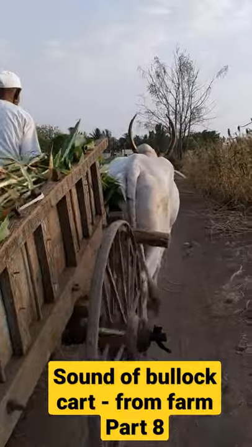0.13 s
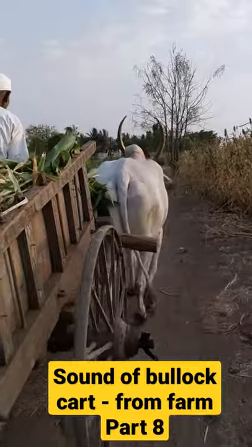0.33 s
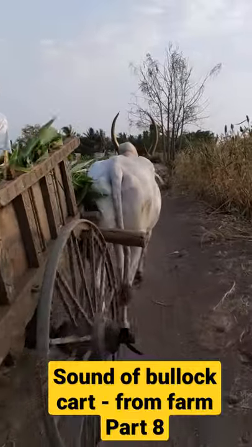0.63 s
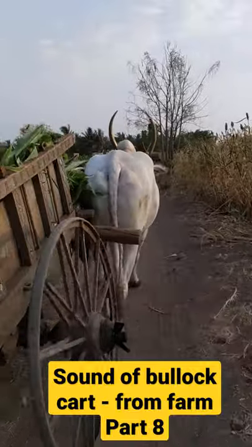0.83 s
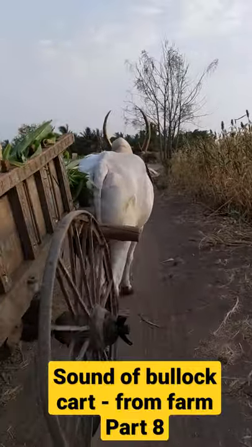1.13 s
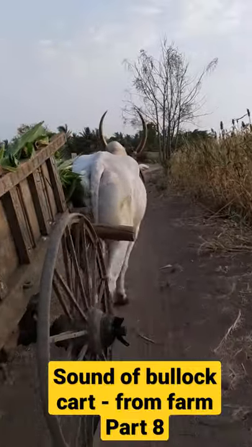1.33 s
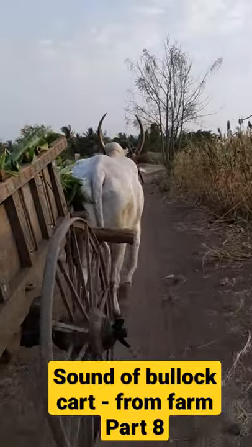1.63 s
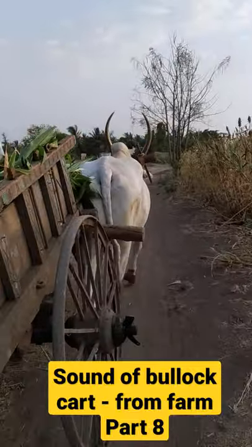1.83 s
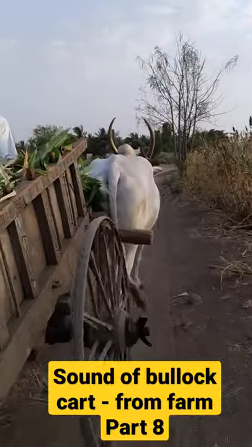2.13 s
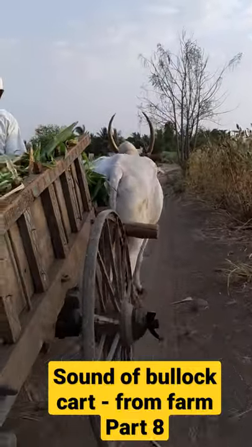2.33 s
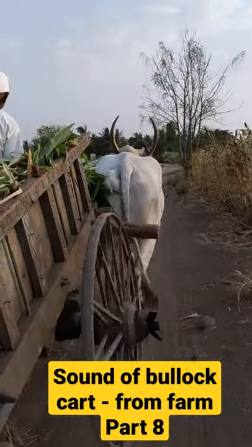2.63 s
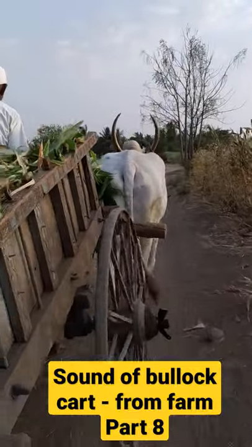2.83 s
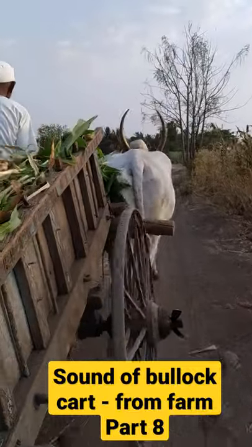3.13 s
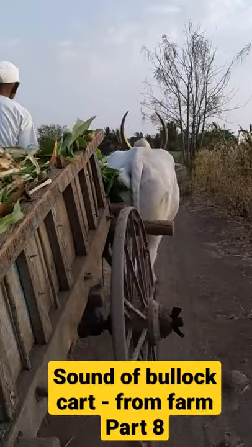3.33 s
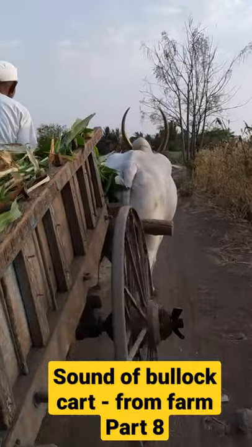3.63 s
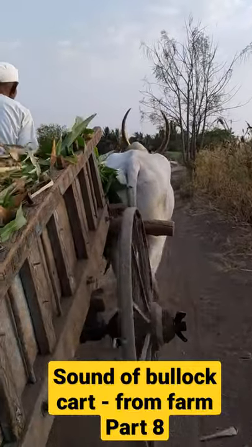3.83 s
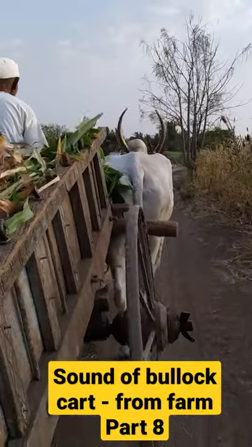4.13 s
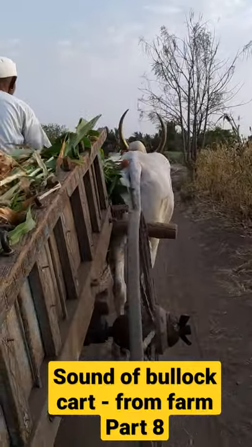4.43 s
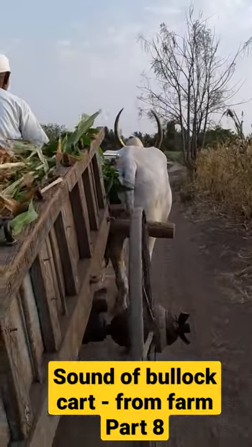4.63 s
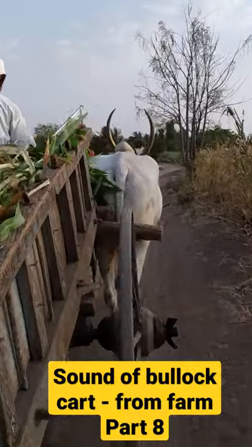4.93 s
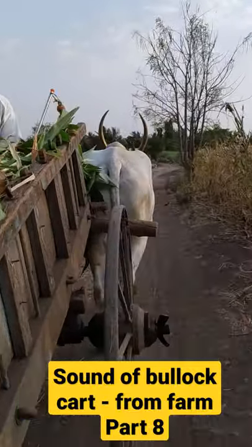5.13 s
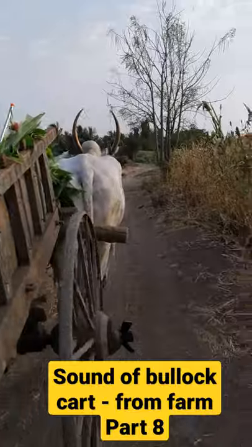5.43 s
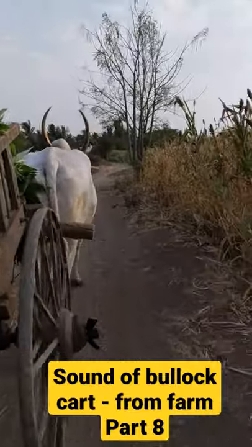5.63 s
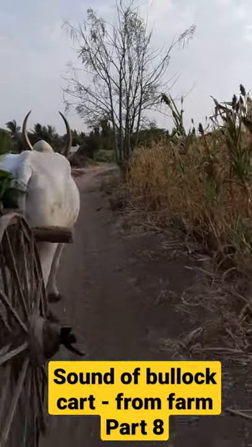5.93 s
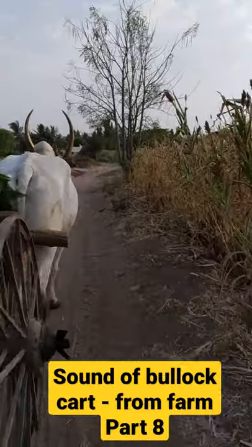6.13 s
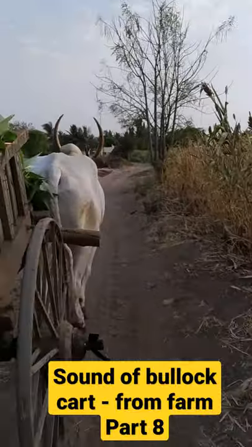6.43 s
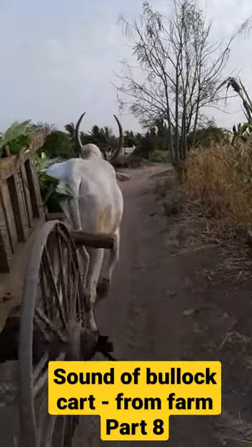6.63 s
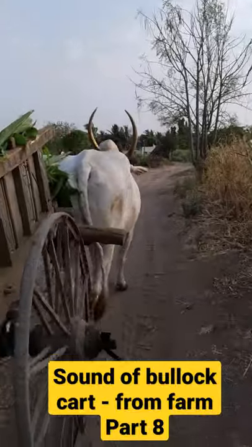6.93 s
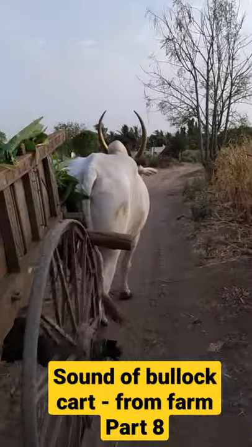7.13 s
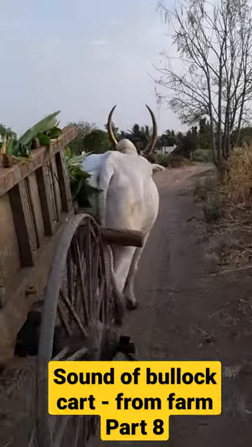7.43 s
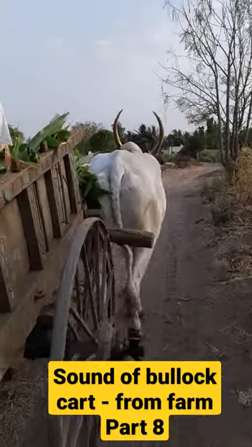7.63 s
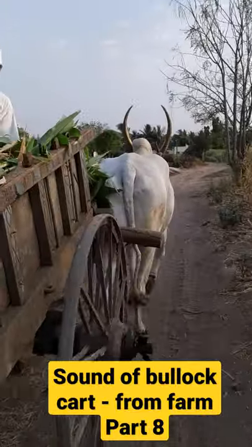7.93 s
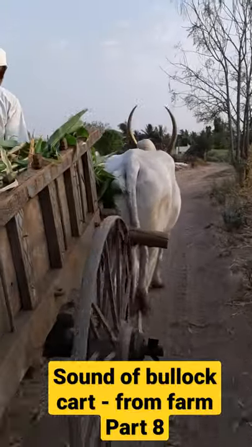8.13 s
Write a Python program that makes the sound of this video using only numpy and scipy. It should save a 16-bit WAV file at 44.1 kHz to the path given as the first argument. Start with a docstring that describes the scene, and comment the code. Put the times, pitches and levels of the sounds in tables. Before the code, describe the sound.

Irregular bright metal clanks and dry wooden knocks from a slow bullock cart, with low frame rumble, gritty rolling and light wind buffeting.

```python
"""Ox cart on a dirt track

Loose iron at the axle clanks when a wheel jolts, and the iron tyre rings on: contact bursts excite decaying modes.
The wooden frame knocks by the same principle and rumbles under a ceaseless shower of small contacts.
Dry grit hisses under the rims as shaped grain noise; wind buffets two microphones as partly shared low noise.
"""
import sys
import numpy as np
from scipy import signal
from scipy.fft import rfft, irfft, next_fast_len
from scipy.io import wavfile
from scipy.ndimage import uniform_filter1d

SR = 44100
rng = np.random.default_rng(int(sys.argv[2]) if len(sys.argv) > 2 else 0)


def waveform_to_disk(signal):
    """Save audio, clipped to [-1, 1], as 16-bit WAV at the path in sys.argv[1]."""
    frames = np.transpose(np.atleast_2d(signal))
    scaled = np.clip(frames, -1, 1) * 32767
    samples = np.round(scaled).astype(np.int16)
    wavfile.write(sys.argv[1], SR, samples)


N = 365588

# iron clanks, levels ahead of the gain of the iron: start_s, level_db, ring under 3.6 kHz and at 3.6-6 kHz
# relative to the treble (low_db, mid_db), leading rings low_hz, mid_hz, treble_hz, rattle_s
CLANKS = [(0.1039, -14, -10.5, -12, 2630, 5300, 7050, 0.012),
          (0.145, -33, -22, -23, 2550, 4640, 7600, 0.065),
          (0.2915, -28.5, -15.5, -12.5, 3400, 3960, 6800, 0.0042),
          (0.398, -31.5, -17, -12, 2080, 4500, 6550, 0.017),
          (0.4262, -17, -16, -9, 2780, 4300, 6500, 0.012),
          (0.4476, -20.5, -1.5, -8, 1930, 4440, 8300, 0.0093),
          (0.5292, -26.5, -9, -5, 2060, 3800, 8340, 0.04), (0.6, -30, -29, -28, 3510, 5460, 8560, 0.045),
          (0.72, -35, 8, -23, 2170, 4400, 7900, 0.022), (0.7386, -27.5, -15, -7, 2550, 4390, 7800, 0.017),
          (0.7524, -14.5, -19.5, -17, 3060, 5020, 9770, 0.0053),
          (0.7728, -14, -19, -22, 2490, 4430, 7730, 0.013), (0.794, -33, -6, 4, 2510, 4450, 7560, 0.022),
          (0.862, -21.5, -10, -17, 2240, 4820, 10030, 0.0039),
          (1.5658, -35, -6, -13.5, 3020, 3800, 9040, 0.016),
          (1.8567, -36.5, 3.5, -9, 2400, 3800, 7250, 0.014),
          (2.5207, -20, -6.5, -14, 2480, 4540, 6760, 0.012),
          (2.5466, -8, -14.5, -23, 2490, 4320, 6500, 0.0088),
          (2.5577, -11.5, -11, -17, 2600, 5020, 9930, 0.0043),
          (2.5743, -27.5, -10, -11, 2670, 5080, 6700, 0.013),
          (2.606, -32.5, -27, -25, 2200, 4380, 9800, 0.01),
          (2.6304, -33.5, -29, -30, 2240, 3860, 7300, 0.0032),
          (2.738, -45, -11, 4, 2290, 5500, 7600, 0.0071), (2.767, -40, -19, -15, 2100, 4690, 8920, 0.0099),
          (2.852, -37, 1, -2, 2270, 4410, 6760, 0.01), (3.164, -24, -17, -10, 2420, 4540, 6980, 0.026),
          (3.1873, -25, 7, 1, 2530, 4380, 5830, 0.0084),
          (3.1961, -9.5, -12.5, -14, 2430, 4440, 9560, 0.0072),
          (3.206, -17, -10, -2, 2660, 4600, 8300, 0.0063), (3.249, -35, 17, -5, 2240, 3750, 9700, 0.0091),
          (3.3406, -28.5, -8.5, -20, 2270, 4850, 6250, 0.0014),
          (3.409, -35, -2, -8, 2140, 4820, 8660, 0.018), (3.431, -36, -11, -34, 3260, 5350, 9800, 0.0029),
          (4.045, -45, 4, -18, 2510, 4410, 6720, 0.013), (4.3695, -34, -5, -13, 2540, 4710, 10000, 0.02),
          (4.493, -38.5, -0.5, -20, 2450, 5190, 9600, 0.02),
          (5.1016, -33, -11.5, -8, 3380, 3860, 7260, 0.019),
          (5.1676, -34.5, -16, -15, 2540, 4730, 7700, 0.014),
          (5.8087, -41.5, 8, -16, 2550, 4000, 8700, 0.011), (5.8396, -33, -12, -20, 2130, 5000, 8870, 0.01),
          (6.0586, -17.5, -15, -17.5, 2700, 4640, 6770, 0.0086),
          (6.099, -8.5, -22, -22, 2500, 4610, 6760, 0.0051),
          (6.1107, -14, -9, -7.5, 2446, 4260, 8000, 0.0079),
          (6.1759, -29.5, 2, -18, 2220, 4400, 6750, 0.018),
          (6.276, -32.5, -12, -10, 2090, 4400, 6800, 0.022),
          (6.3736, -28, -16.5, -14, 2830, 4500, 6760, 0.011),
          (6.3914, -45, -21, -20, 3340, 4800, 6780, 0.034),
          (6.427, -34.5, -9, -16.5, 2560, 4660, 7450, 0.026), (6.553, -33, 4, -16, 2170, 5070, 6750, 0.013),
          (7.3443, -32, -14, -27, 2260, 4360, 8040, 0.0061),
          (8.069, -38.5, -10, 2, 3200, 3800, 6840, 0.012),
          (8.1373, -32.5, -30, -5, 1950, 4430, 8060, 0.022),
          (8.196, -36, -22, -13, 2350, 5070, 6810, 0.013)]
# frame knocks, levels ahead of the gain of the frame: start_s, level_db, ring above 750 Hz relative to
# the middle (high_db), leading rings under and above 750 Hz (low_hz, high_hz), shudder_s
KNOCKS = [(0.102, -17.5, 10, 442, 1755, 0.011), (0.12, -19, -3.5, 527, 1090, 0.019),
          (0.293, -32, 2, 604, 1020, 0.011), (0.403, -40, -15, 600, 870, 0.026),
          (0.424, -20.5, 12, 654, 910, 0.027), (0.535, -21.5, 1, 566, 1010, 0.026),
          (0.702, -30.5, 9, 610, 960, 0.0084), (0.727, -27, 19, 560, 1080, 0.014),
          (0.779, -20, 19, 432, 1170, 0.018), (0.807, -28, -11, 560, 1100, 0.012),
          (0.845, -26, 4.5, 537, 1150, 0.02), (0.883, -15.5, 30, 500, 1600, 0.0041),
          (0.897, -31, 12, 500, 1090, 0.0043), (0.916, -36, 15, 510, 1300, 0.0075),
          (0.934, -33, 21, 596, 1590, 0.02), (0.982, -32.5, 3, 627, 1300, 0.015),
          (1.003, -34.5, -8, 624, 830, 0.0098), (1.124, -38, 12, 644, 1160, 0.0087),
          (1.25, -47.5, 6, 640, 1520, 0.028), (1.511, -35, -1, 626, 780, 0.0055),
          (1.558, -39.5, 11, 640, 840, 0.093), (1.771, -39.5, 3, 646, 1580, 0.014),
          (1.988, -31.5, 0, 573, 1040, 0.026), (2.08, -42, 8, 610, 780, 0.024),
          (2.101, -32, 3, 590, 805, 0.022), (2.119, -36, 0, 450, 910, 0.0069),
          (2.154, -32, -7, 555, 770, 0.0079), (2.332, -35, -8, 490, 930, 0.037),
          (2.393, -35, 5, 503, 800, 0.018), (2.499, -37, 3, 650, 940, 0.0071),
          (2.516, -24.5, 3, 447, 890, 0.06), (2.546, -21, 11, 437, 870, 0.028),
          (2.693, -30.5, 4, 624, 880, 0.006), (2.775, -41, 1, 585, 1050, 0.026),
          (2.989, -38, 6, 643, 940, 0.035), (3.009, -34, 8, 510, 750, 0.051),
          (3.06, -37.5, -7, 620, 780, 0.024), (3.166, -30, -5, 446, 960, 0.0095),
          (3.207, -28.5, -11, 616, 1340, 0.012), (3.342, -33.5, -1.5, 552, 875, 0.016),
          (3.432, -34.5, -1, 493, 1520, 0.017), (3.761, -40.5, 3, 586, 1010, 0.0059),
          (3.855, -46, -8, 640, 1300, 0.014), (3.88, -37, -4, 605, 1200, 0.02),
          (3.938, -37.5, -5, 660, 1080, 0.062), (3.983, -31.5, 0, 610, 910, 0.011),
          (4.15, -44.5, -15, 530, 1580, 0.1), (4.255, -37.5, -0.5, 583, 920, 0.015),
          (4.344, -40.5, 0, 626, 940, 0.05), (4.368, -37, -2, 530, 860, 0.013),
          (4.501, -40.5, -4, 526, 940, 0.023), (4.539, -40, 9, 580, 1060, 0.019),
          (4.586, -41.5, -6, 605, 970, 0.014), (4.626, -39, -13, 627, 1020, 0.0045),
          (4.833, -38.5, -5, 606, 1000, 0.014), (5.109, -40, 7, 684, 750, 0.054),
          (5.084, -41, 3, 560, 900, 0.0054), (5.79, -36.5, 0, 554, 970, 0.013),
          (5.81, -32.5, 1.5, 644, 1300, 0.1), (5.947, -34.5, 7, 650, 1020, 0.016),
          (5.975, -32, 0, 580, 1310, 0.01), (6.034, -30.5, 2, 615, 905, 0.016),
          (6.055, -23.5, 8, 616, 910, 0.044), (6.108, -31.5, -15, 530, 1010, 0.046),
          (6.1975, -14.5, 15, 653, 980, 0.0022), (6.205, -24, 8, 640, 855, 0.0086),
          (6.266, -29.5, 3, 447, 810, 0.036), (6.366, -26.5, 3.5, 690, 930, 0.034),
          (6.557, -29, 5, 674, 900, 0.035), (6.649, -34.5, 10, 484, 1140, 0.013),
          (6.744, -42, -2, 595, 780, 0.012), (6.807, -41, -8, 585, 980, 0.0026),
          (7.118, -39.5, -4.5, 670, 1760, 0.021), (7.344, -24, 12.5, 450, 885, 0.018),
          (7.404, -31.5, 6, 647, 860, 0.067), (7.44, -39, -15, 704, 810, 0.037),
          (7.5, -38, -3.5, 492, 1500, 0.12), (7.588, -40, -3, 560, 1140, 0.0088),
          (7.659, -37.5, -13, 500, 1340, 0.0062), (7.916, -47, 2, 570, 1060, 0.017),
          (8.073, -44.5, 0, 600, 1610, 0.023), (8.134, -23, 15, 440, 950, 0.015),
          (8.165, -30.5, 9, 600, 1000, 0.016), (8.194, -26, 6.5, 500, 920, 0.019)]
# modes of the iron fittings, the last six being the broad crack of contact: pitch_hz, level_db, t60_s
IRON_MODES = [(2080, 1, 0.049), (2224, -2.5, 0.12), (2296, -10, 0.06), (2500, 1, 0.093), (2523, -8, 0.086),
              (2696, -4.5, 0.14), (2920, -5, 0.02), (3114, -1.5, 0.085), (3370, 1, 0.062), (3790, 3, 0.039),
              (4185, 1.5, 0.057), (4390, -0.5, 0.089), (4640, -6, 0.054), (5070, 6, 0.045),
              (5436, 6, 0.032), (6792, 6.5, 0.023), (7843, 0, 0.018), (8190, 6, 0.025), (8990, -7, 0.026),
              (9840, 3.5, 0.02), (11200, -5.5, 0.028), (2860, 23, 0.0021), (3760, 18, 0.0016),
              (4670, 20, 0.0036), (5800, 3, 0.0027), (8460, 14, 0.00091), (12700, 13.5, 0.00061)]
# modes of the wooden frame, the last three being the broad crack of contact: pitch_hz, level_db, t60_s
WOOD_MODES = [(242.3, 7.5, 0.045), (445, -4, 0.1), (512, -7, 0.11), (570.4, 1, 0.07), (624.7, 4.5, 0.039),
              (705, -0.5, 0.02), (806, -2, 0.03), (920, -3.5, 0.037), (1042, 0, 0.0216),
              (1186, -2.5, 0.018), (1597, -3.5, 0.0071), (1600, 0, 0.014), (910, 2.5, 0.0048),
              (1353, 19.5, 0.0013), (1960, 11.5, 0.0035)]
IRON_LAG, WOOD_LAG = 4, 10  # samples by which the right microphone hears each part later


def undb(db):
    """Inverts the decibel law: level to amplitude gain."""
    return 10 ** (np.asarray(db) / 20)


def unit(x):
    """Normalises the effective value: rms 1."""
    return x / np.sqrt(np.mean(x ** 2))


def coloured(x, table):
    """Spectral shaping: weights each frequency by a curve of (Hz, dB) points, straight in log frequency."""
    hz, db = np.transpose(table)
    size = next_fast_len(len(x))
    bins_hz = np.arange(size // 2 + 1) * SR / size + 1  # 1 Hz up, to keep the logarithm finite
    gain = undb(np.interp(np.log(bins_hz), np.log(hz), db))
    return unit(irfft(rfft(x, size) * gain, size)[:len(x)])


def walk(rate):
    """Slow random modulation: levels held 1 / rate s, smoothed twice by a moving mean; spread 1."""
    hold = int(SR / rate)
    steps = np.repeat(rng.standard_normal(N // 100)[:N // hold + 1], hold)
    smooth = uniform_filter1d(uniform_filter1d(steps, hold), hold)[:N]
    return smooth / smooth.std()


def curves(table):
    """Linear interpolation in time of the columns of a table."""
    s, *columns = np.transpose(table)
    return [np.interp(np.arange(N) / SR, s, c) for c in columns]


def rings(modes, size):
    """Modal synthesis: one exponentially decaying sine a row."""
    hz, db, t60 = np.transpose(modes)[:, :, None]
    t = np.arange(size) / SR
    return undb(db - 60 * t / t60) * np.sin(2 * np.pi * hz * t)


def pair(x, pan_db, lag):
    """Two-microphone localisation: a level difference and a later arrival on the right."""
    return np.array([x * undb(pan_db / 2), np.roll(x, lag) * undb(-pan_db / 2)])


def lead(hz, leads_hz, db, octaves):
    """Selective excitation: lift in dB of the modes that lie near the leading rings of a blow."""
    return sum(db * np.exp(-(np.log2(hz / f) / octaves) ** 2) for f in leads_hz)


def due(flurry, modes):
    """Resonance bandwidth: gain in dB that gives each mode its even share of a flurry's push."""
    power = np.abs(rfft(flurry)) ** 2
    bins_hz = np.linspace(0, SR / 2, len(flurry) // 2 + 1)
    detuning = (bins_hz - modes[:, :1]) * modes[:, 2:] * 2 * np.pi / np.log(1000)  # in half bandwidths
    reach = 1 / (1 + detuning ** 2)
    return -10 * np.log10(reach @ power / reach.sum(1) / power.mean())


def blows(events, modes, group_db, pan_db, lag, held, spot_db, side_db, apart, uneven_db, after_db, size):
    """Impact excitation: each blow is a flurry of small contacts that rings the modes; its spot sets their shares."""
    free_db = -24  # blows this hard throw the parts clear
    rise_s, rise_share = 0.0021, 0.061  # a blow swells for this long plus a share of its length
    out = np.zeros((2, N + 3 * size))
    modes = np.array(modes, float)
    t = np.arange(size) / SR
    spot = rng.standard_normal((len(events), 4, len(modes)))
    # contacts come in clumps of 60 samples; the first 180 keep one set level
    clumps = np.repeat(rng.standard_normal((len(events), size // 60)), 60, axis=1)
    clumps[:, :180] = 1
    noise = rng.standard_normal((len(events), 2, size)).transpose(1, 0, 2)
    near, far = noise * undb(uneven_db * clumps)
    apart = np.clip(apart, 0, 1)  # share of the contacts that reach the right microphone by other paths
    contact = np.stack([near, np.sqrt(1 - apart) * near + np.sqrt(apart) * far], axis=1)
    for k, (s, db, *colour, length) in enumerate(events):
        share_db = spot_db * spot[k, 1] + group_db(*colour)
        # light taps crack more than they ring
        share_db += (modes[:, 2] > .02) * 0.19 * (db + 9.5)
        # parts that touch pull each other's modes a little off pitch
        detune = 1 + np.outer(spot[k, 3], [.008, 0, 0])
        # lighter blows leave the parts touching: ring time shortens by `held` dB per dB under free_db
        damping = undb(held * min(db - free_db, 0))
        struck = modes * detune * [1, 1, damping]
        ring = rings(struck, size=size)
        length = np.clip(length, .002, .08)
        # the parts chatter, fall apart, and go on trembling
        force = np.exp(-(t / length) ** 2) + undb(after_db) * np.exp(-t / (1.4 * length))
        flurry = contact[k] * force * np.minimum(t / (rise_s + rise_share * length), 1)
        # each mode beams its own way, so the microphones get unlike shares
        sides = []
        for way, push in zip((1, -1), flurry):
            level_db = share_db + due(push, struck) + way * side_db * spot[k, 2]
            response = (np.sign(spot[k, 0]) * undb(level_db)) @ ring
            sides.append(signal.fftconvolve(push, response))
        left, right = sides
        sound = np.array([left * undb(pan_db / 2), np.roll(right, lag) * undb(-pan_db / 2)])
        at = int(s * SR)
        out[:, at:at + len(left)] += undb(db) * sound / np.abs(left).max()
    return out[:, :N]


def taps(db, colours_db, leads_hz):
    """Random arrivals: rows of faint stray blows at chance moments, each with its own colour."""
    count = int(9 * N / SR)  # 9 taps a second
    when = rng.random(count)
    loudness, hue, pitch = rng.standard_normal((count, 3)).T
    colours = [c + 6 * hue for c in colours_db]
    leads = [f * np.exp(.15 * pitch) for f in leads_hz]
    length_s = .012 + 0 * when
    return list(zip(when * N / SR, db + 3 * loudness, *colours, *leads, length_s))


def shaken(modes, bumps_db, grain_db):
    """Continuous modal excitation: a ceaseless shower of small uneven contacts into the modes."""
    grains = np.repeat(rng.standard_normal(N // 40 + 1), 40)[:N]
    contacts = rng.standard_normal(N) * undb(bumps_db + grain_db * grains)
    return unit(signal.fftconvolve(contacts, rings(modes, size=6000).sum(0))[:N])


def aftershock(events, after_db, t60, calm_db):
    """Exponential energy decay: level in dB of a part that shakes on after every blow, down to its calm level."""
    kicks = np.zeros(N)
    for s, db, *_ in events:
        kicks[int(s * SR)] = undb(2 * (db + after_db))  # as power
    decay = undb(-120 / max(t60, .05) / SR)
    power = signal.lfilter([1], [1, -decay], kicks)
    return 10 * np.log10(power + undb(2 * calm_db))


def iron():
    """Impact of stiff bodies: linchpin, washers and hub rings knock together and ring their modes."""
    hz = np.array(IRON_MODES)[:, 0]

    def group_db(low, mid, *leads):
        """Spectral balance: level of each mode by its band and its nearness to the leading rings."""
        return np.select([hz < 3600, hz < 6000], [low, mid], 0) + lead(hz, leads, 12.5, 0.039)

    strays = taps(-51, [-10, -20], [2500, 4500, 8000])
    return undb(7.0) * blows(CLANKS + strays, IRON_MODES, group_db, pan_db=2.5, lag=IRON_LAG, held=1.12,
                             spot_db=2.5, side_db=2.0, apart=0.87, uneven_db=1.0, after_db=5.0, size=9000)


def chatter(db):
    """Sustained rattling: the loose iron trembles on after each jolt."""
    bumps_db = 3 * walk(90)
    # many parts, many paths: one shared tremble and one for each microphone
    shared, left, right = (shaken(IRON_MODES, bumps_db, grain_db=1.5) for _ in range(3))
    return undb(db) * (undb(-6.0) * pair(shared, 0.24, IRON_LAG) + undb(-1.5) * np.array([left, right]))


def tyre():
    """Lightly damped resonance: the hardest jolts set the iron tyre of the wheel ringing."""
    # modes of the tyre, which rings on: pitch_hz, level_db, t60_s
    tyre_modes = [(1035, -9, 0.6), (1105, -5, 0.9), (1180, -7, 0.5), (1590, -8, 0.4), (2110, -5, 0.28),
                  (2165, -5, 0.35), (2248, -3, 0.35), (2850, -6, 0.2), (3378, -7, 0.25), (3490, -7, 0.28)]
    # jolts that reach the tyre, levels ahead of the flutter: start_s, level_db, ring under 1.8 kHz and above
    # 3 kHz relative to the middle (low_db, high_db), leading rings under and above 1.8 kHz (low_hz, high_hz), rattle_s
    jolts = [(.11, -37.5, 12, -8, 1090, 2245, 0.03), (.78, -34.5, -8, -9, 1114, 3440, .02),
             (2.552, -33.5, -9, -12, 1590, 2245, 0.06), (3.2, -29, -4.5, 6.5, 1138, 2110, 0.03),
             (5.105, -41.5, 1, 4, 1180, 3360, .02), (6.11, -30, -8, 7, 1114, 2248, 0.021)]
    hz = np.array(tyre_modes)[:, 0]

    def group_db(low, high, *leads):
        """Spectral balance: level of each mode by its band and its nearness to the leading rings."""
        return np.select([hz < 1800, hz > 3000], [low, high], 0) + lead(hz, leads, 10, .03)

    ring = blows(jolts, tyre_modes, group_db, pan_db=1.5, lag=IRON_LAG, held=0,
                 spot_db=-1.5, side_db=4.5, apart=0, uneven_db=-1, after_db=1, size=18000)
    # the rolling tyre rubs on the dirt, so its ring flutters: 5 dB spread, 60 levels a second
    return ring * undb(5 * walk(60))


def frame():
    """Impact of well-damped bodies: planks, spokes and hub knock in their joints."""
    hz = np.array(WOOD_MODES)[:, 0]

    def group_db(high, *leads):
        """Spectral balance: level of each mode by its band and its nearness to the leading rings."""
        return np.select([hz > 750, hz < 330], [high, -2.5], 0) + lead(hz, leads, 11, 0.15)

    strays = taps(-48, [3], [570, 1150])
    return undb(4.0) * blows(KNOCKS + strays, WOOD_MODES, group_db, pan_db=2, lag=WOOD_LAG, held=0,
                             spot_db=3.0, side_db=1.62, apart=0, uneven_db=2.5, after_db=8.0, size=6000)


def rumble(db):
    """Random forced vibration: clods under the wheels shake the frame."""
    return undb(db) * pair(shaken(WOOD_MODES, 3.6 * walk(45), grain_db=2.5), 0.15, WOOD_LAG)


def grit(db):
    """Granular noise: dust and dry stalks crushed all round, in fine grains unrelated at the two microphones."""
    # spectrum of the grains: pitch_hz, density_db (per Hz)
    grain_spectrum = [(590, -11), (1000, -1), (1100, -13), (1420, -11), (2300, -5.5), (6020, -8),
                      (8720, 4.5), (12500, -9.5), (13500, -11), (15000, -9), (15900, -33)]
    crunch = np.maximum(walk(60) - 1, 0)  # now and then a clod breaks
    raw = rng.standard_normal((2, N)) * undb(5.0 * rng.standard_normal((2, N)))
    grains = np.array([undb(side_db) * coloured(g, grain_spectrum) for g, side_db in zip(raw, (4.5, 3))])
    out = 0
    edges_hz = [300, 1500, 2500, 4000, 6500, 11000, 20000]  # grain sizes that swell on their own
    for low, high in zip(edges_hz, edges_hz[1:]):
        band = signal.sosfilt(signal.butter(3, [low, high], "band", fs=SR, output="sos"), grains)
        out = out + band * undb(1.1 * walk(45) + 1.2 * walk(9) + 2.2 * crunch)
    return undb(db) * out


def wind(db):
    """Turbulent pressure noise: eddies at the microphone ports, stronger on the left, partly shared."""
    # spectrum of the eddies: pitch_hz, density_db (per Hz)
    eddy_spectrum = [(15, -1), (40, 2), (80, -6), (160, -13.5), (320, -22.5), (900, -44.5)]
    shared, left, right = (coloured(rng.standard_normal(N), eddy_spectrum) * undb(2.8 * walk(19))
                           for _ in range(3))
    left_port = undb(4.5) * left + undb(-3.5) * shared
    right_port = undb(-21.0) * right + undb(-2.0) * shared
    return undb(db) * np.array([left_port, right_port])


def gusts():
    """Addition of powers: level in dB of the wind, a slow swell with bell-shaped puffs on top."""
    # slow swell of the wind, ahead of the gains at the ports: time_s, level_db
    swell = [(0.0, -57), (1.22, -48.5), (1.57, -46), (1.98, -53), (2.72, -56.5), (3.07, -55.5),
             (4.18, -59.5), (4.57, -48.5), (5.56, -51.5), (5.75, -48), (6.6, -54), (7.25, -52), (7.64, -57),
             (8.29, -56.5)]
    # single puffs, ahead of the gains at the ports: centre_s, level_db, length_s
    puff_rows = [(0, -38, 0.034), (0.098, -29, 0.0092), (0.293, -40.5, 0.084), (0.389, -43, 0.016),
                 (0.524, -31.5, 0.0081), (0.9, -41, 0.025), (1.13, -41, 0.016), (1.613, -42, 0.047),
                 (1.962, -49, 0.025), (2.258, -42.5, 0.0073), (3.002, -40, 0.012), (4.156, -50, 0.017),
                 (4.338, -48, 0.029), (5.044, -41.5, 0.067), (5.666, -43, 0.034), (5.817, -34, 0.062),
                 (7.06, -40, 0.083), (7.366, -37.5, 0.073), (7.871, -39.5, 0.031)]
    t = np.arange(N) / SR
    puffs = sum(undb(2 * db) * np.exp(-((t - s) / length) ** 2) for s, db, length in puff_rows)
    return 10 * np.log10(undb(2 * curves(swell)[0]) + puffs)


def scene():
    """Superposition: the cart and the air around the microphones."""
    # rolling, rumble being the calm level of the frame: time_s, rumble_db, grit_db
    rolling = [(0.0, -39.5, -51), (0.11, -47.5, -47.5), (0.41, -44, -52), (0.69, -37.5, -49.5),
               (0.85, -45, -44), (1.08, -55, -56), (1.94, -55, -57), (2.38, -58, -52), (2.54, -44, -52.5),
               (3.32, -50.5, -51.5), (3.58, -59, -56), (4.41, -53, -50), (4.94, -56, -51),
               (5.75, -54.5, -60.5), (6.0, -52, -47), (6.23, -43, -46), (6.51, -46, -53.5),
               (6.79, -52.5, -54), (7.13, -56, -58), (7.55, -49.5, -49), (7.92, -51.5, -55.5),
               (8.29, -59.5, -57)]
    rumble_db, grit_db = curves(rolling)
    # shaking starts 17.5 dB under the listed level of each blow
    shaking = rumble(aftershock(KNOCKS, after_db=-17.5, t60=0.34, calm_db=rumble_db))
    trembling = chatter(aftershock(CLANKS, after_db=-17.5, t60=0.21, calm_db=-58.5))
    return iron() + tyre() + frame() + shaking + trembling + grit(grit_db) + wind(gusts())


def record(dry):
    """Amplitude limiting and band limiting: clips at full scale, then cuts steeply above 15.85 kHz."""
    top_cut = signal.ellip(12, .2, 90, 15850, fs=SR, output="sos")
    return signal.sosfilt(top_cut, np.clip(dry, -1, 1))


dry = scene()
out = record(dry)
waveform_to_disk(out)
```